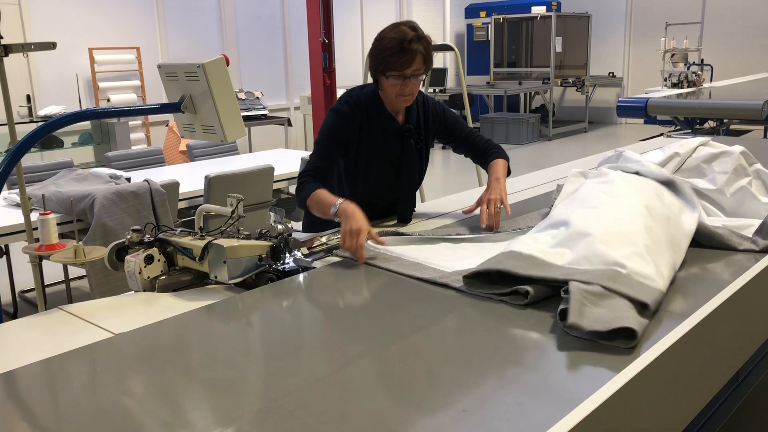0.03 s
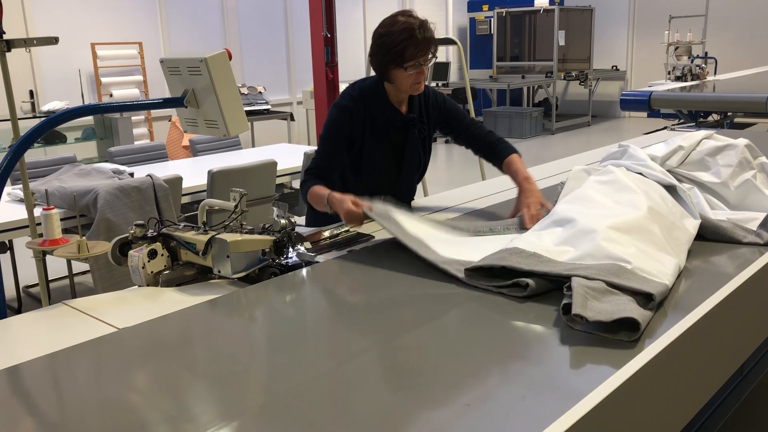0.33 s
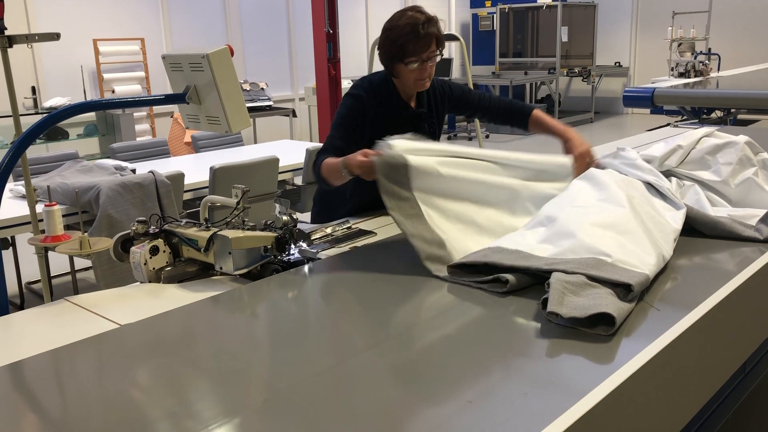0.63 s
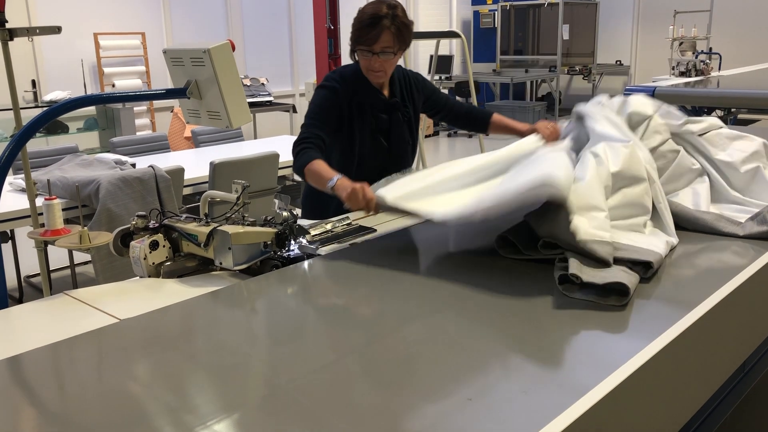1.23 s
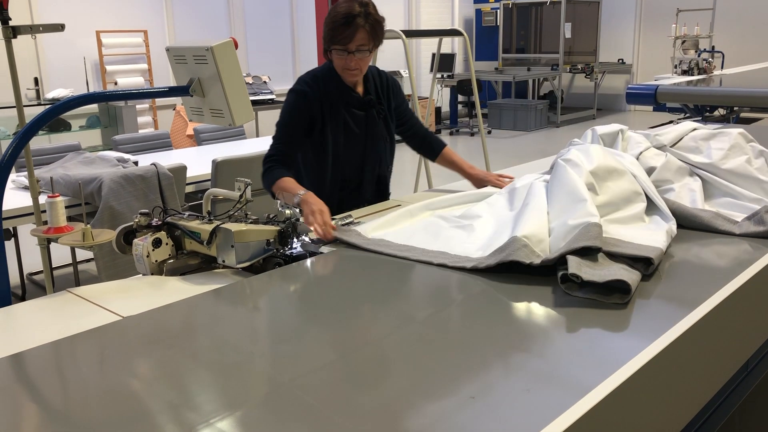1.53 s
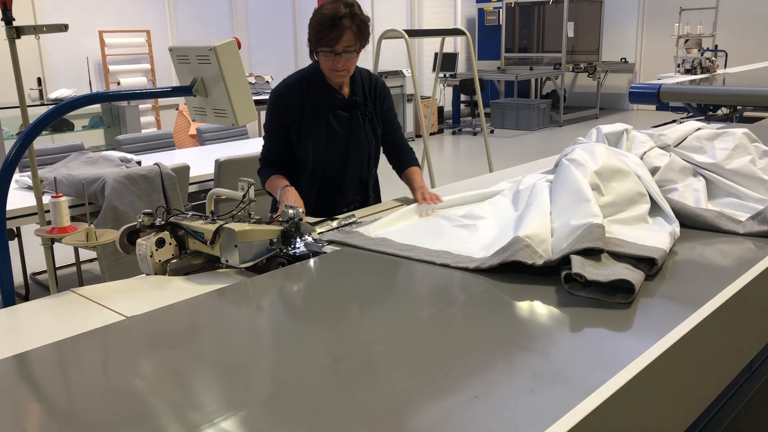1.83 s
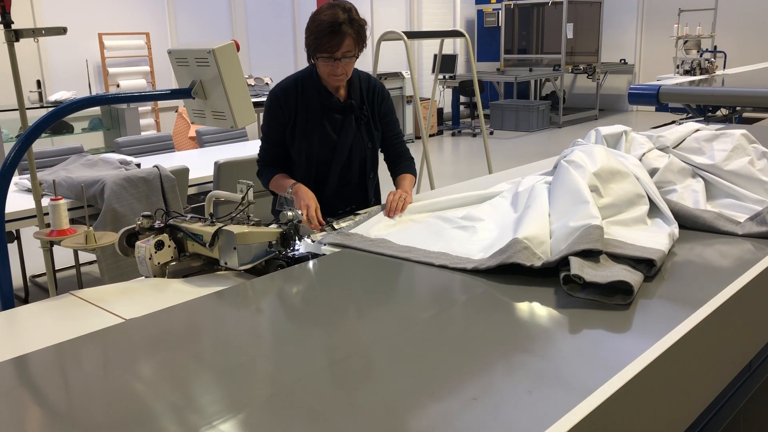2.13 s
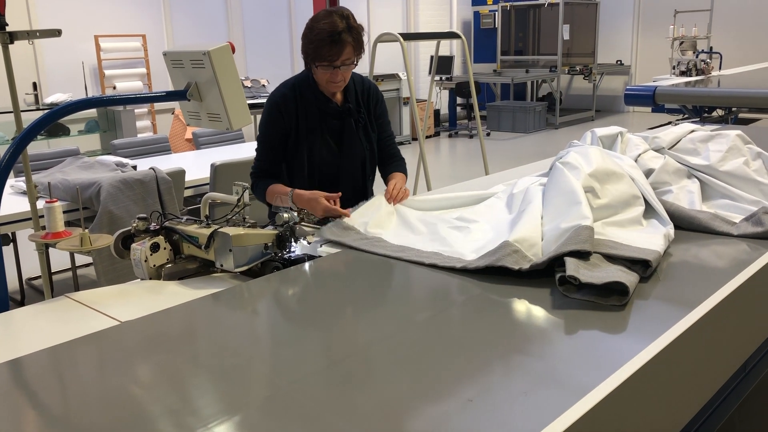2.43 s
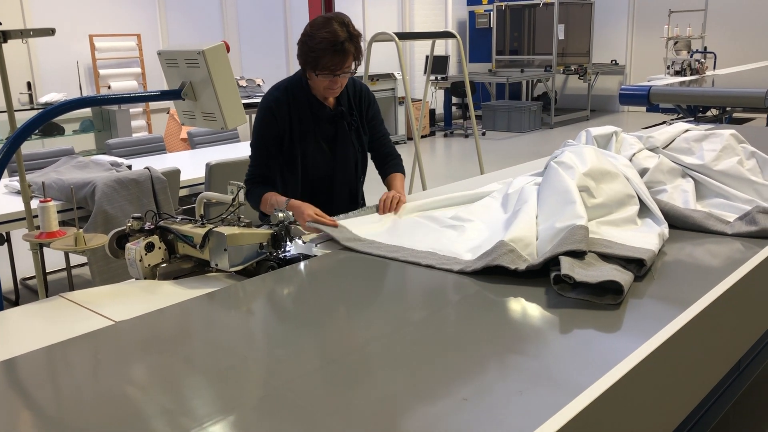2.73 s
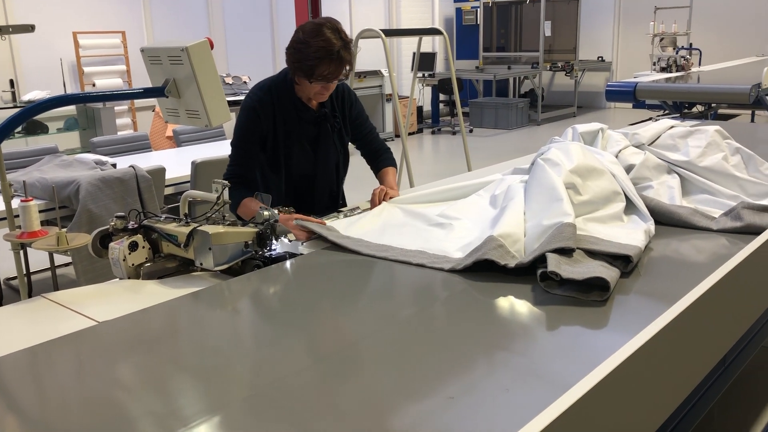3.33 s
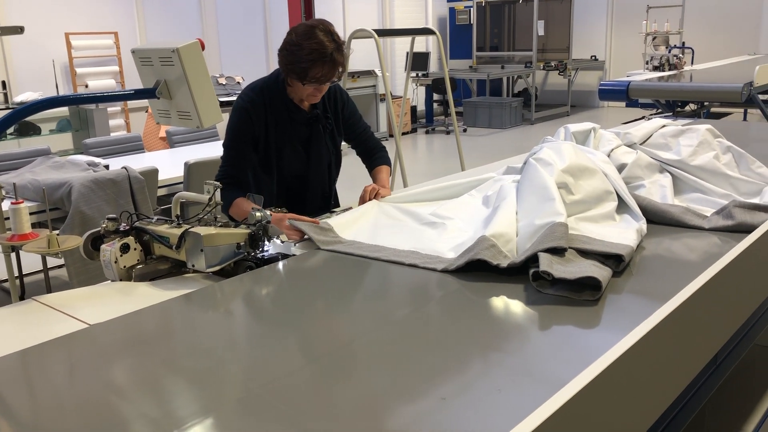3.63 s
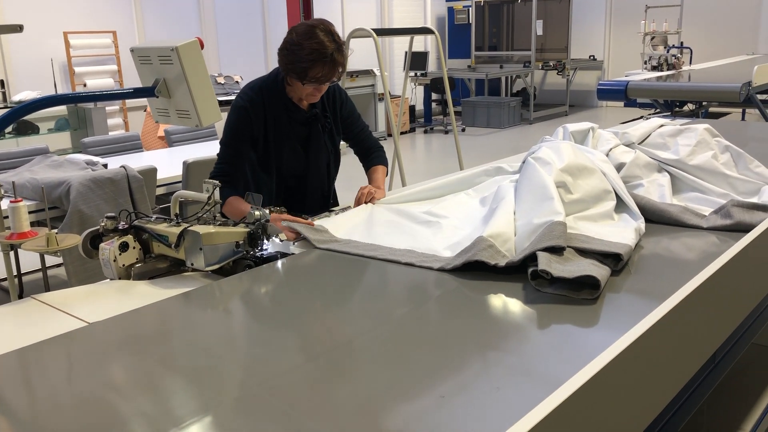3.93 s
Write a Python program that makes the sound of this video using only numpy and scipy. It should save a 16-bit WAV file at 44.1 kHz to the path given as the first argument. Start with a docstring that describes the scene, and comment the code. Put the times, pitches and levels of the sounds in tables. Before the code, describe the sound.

Heavy fabric swishes up, snaps taut and flops onto a table with dull thumps and crease pops. It slides with a hiss and a small metal clink, over steady motor hum and ventilation in a workshop hall.

```python
"""Over a workshop's hum, a crease pops and a heavy coated curtain swishes up, its ribbed weave zipping
under the fingers. Flung over a sewing table, the sheet snaps taut and flops down in dull thumps and
more pops. It slides back with a friction hiss, and a small metal part clinks as the edge is laid by
the machine. A short hall tail follows each move; motors and ventilation run steadily underneath."""
import sys
import numpy as np
from scipy import signal
from scipy.fft import rfft, irfft, next_fast_len
from scipy.io import wavfile
from scipy.ndimage import map_coordinates

SR = 44100
rng = np.random.default_rng(int(sys.argv[2]) if len(sys.argv) > 2 else 0)


def persist_wave(psi):
    """Save psi, clipped to +-1, as 16-bit WAV."""
    counts = np.round(np.clip(psi, -1, 1) * 32767).astype(np.int16)
    wavfile.write(sys.argv[1], SR, np.atleast_2d(counts).T)


N = 176400

# cloth swishing through the air (start [s], attack [s], hold [s], release [s], level [dB])
AIR_SWISHES = [(.43, 0.047, .11, 0.2, -54), (.69, 0.047, 0.037, 0.035, -62),
               (.785, 0.023, 0.2, 0.12, -56.5), (1.1, .05, 0.11, 0.24, -61),
               (1.75, 0.14, 0.13, 0.26, -61.5), (2.7, .14, .06, .15, -65)]
# bright hiss of a swish (frequency [Hz], gain [dB])
SWISH_EQ = [(300, -11), (1000, 1.5), (2800, 4), (5000, 3), (7000, -3), (9500, -1.5), (13500, -4),
            (16000, -12)]
# cloth dragging on the table (start [s], attack [s], hold [s], release [s], level [dB])
TABLE_DRAGS = [(.81, 0.012, 0.054, 0.22, -53), (1.09, 0.034, 0.089, 0.37, -58.5),
               (1.96, 0.14, 0.051, 0.3, -48.5)]
# darker, midrange rub of a drag (frequency [Hz], gain [dB])
DRAG_EQ = [(150, -25), (450, -3.5), (600, -2.5), (750, 5), (900, -1.5), (1200, 2), (1450, -4), (1750, 0.5),
           (2150, -4.5), (2700, -13), (4100, -10.5), (5700, -16.5), (7200, -22), (9300, -19.5),
           (11000, -28), (16000, -33)]
# ribs of the weave passing the fingers (time [s], rate [ribs/s], level [dB])
ZIP_GESTURE = [(.445, 1700, -77), (.458, 2200, -65), (.476, 2630, -47.5), (.493, 2300, -61),
               (.512, 1850, -57.5), (.546, 1700, -56), (.552, 2700, -68), (.561, 3100, -48.5),
               (.571, 3800, -50), (.582, 4500, -69)]
# crack of the sheet snapping taut (frequency [Hz], gain [dB])
SNAP_EQ = [(200, -27), (800, -5), (1600, 1), (3000, -6), (4700, -8), (5800, -24), (7500, -42), (14000, -60)]
# the cloth's weight landing (time [s], level [dB])
THUMP_HITS = [(.8262, -29), (.853, -41), (.954, -33.5)]
# dull ring of a thump (frequency [Hz], gain [dB], t60 [s])
THUMP_BODY = [(255, -8, .05), (330, -1, .06), (483, -4.5, 0.021), (610, -6, .035)]
# creases popping (time [s], peak [dB], centre [Hz], t60 [s])
CREASE_POPS = [(.156, -43.5, 2430, 0.01), (.5765, -39, 900, .012), (.875, -39, 1090, .008),
               (0.887, -44, 1500, 0.0094), (0.899, -39.5, 1700, 0.0073), (.9545, -37.5, 810, 0.0062),
               (1.1155, -43.5, 1500, .006), (1.13, -38.5, 1300, .008), (1.134, -38.5, 2800, 0.0083),
               (1.1624, -36, 1400, .008), (1.1822, -43, 4000, 0.0043), (1.197, -42, 4020, .007),
               (1.256, -45, 2400, 0.019), (1.302, -47, 1000, 0.0091), (1.426, -43.5, 3800, .012)]
# small hard parts ticking (time [s], peak [dB])
TICK_HITS = [(1.147, -41), (1.1595, -31), (1.957, -45)]
# glassy top end of a tick (frequency [Hz], gain [dB])
TICK_EQ = [(2000, -37), (6000, -11), (10000, -14), (11500, -2.5), (13000, 3), (14200, -26), (16000, -12)]
# metal touching the table (time [s], level [dB])
CLINK_HITS = [(1.75, -37), (1.7746, -42), (1.783, -40.5), (1.96, -51)]
# ring of the metal part (frequency [Hz], gain [dB], t60 [s])
METAL_MODES = [(4070, -15.5, 0.12), (4470, -3.5, .045), (4610, -1.5, 0.039), (5560, -12, 0.04),
               (6370, -4.5, 0.026), (6780, -10, .03), (7780, -11.5, 0.047), (8740, -17, 0.073),
               (10000, -17, .035)]
# gritty edge of a clink (frequency [Hz], gain [dB])
SCRAPE_EQ = [(2000, -27), (4200, -3), (7500, -2), (11000, -4), (16000, -12)]
# decay of the hall (frequency [Hz], t60 [s])
HALL_DECAY = [(200, 0.99), (2000, 0.41), (12000, 0.34)]
# swells and dips of the main motor hum (time [s], level [dB])
HUM_FADER = [(0.0, -41), (0.03, -40.5), (0.4, -37), (0.97, -38), (1.24, -43), (1.64, -37), (1.78, -40),
             (2.27, -39), (2.42, -44), (2.48, -39.5), (2.86, -40), (3.02, -38), (3.05, -40.5),
             (3.09, -37.5), (3.38, -38), (4.0, -43.5)]
# thin machine whines (frequency [Hz], level [dB])
MACHINE_WHINES = [(1196, -73), (2386, -73.5), (3585.5, -76), (4558, -84)]
# low rumble of the ventilation (frequency [Hz], gain [dB])
RUMBLE_EQ = [(20, -30), (30, -17), (40, -8.5), (52, -5.5), (68, 0), (100, -2.5), (150, 2), (210, -1.5),
             (300, -4.5), (380, -8.5), (520, -54), (1000, -68)]
# airy hiss of the ventilation (frequency [Hz], gain [dB])
AIR_EQ = [(240, -33), (400, 0), (450, -3), (500, 0.5), (600, -2), (750, -1), (1200, -5.5), (1400, -6.5),
          (2200, -10.5), (2700, -8), (3200, -11.5), (4500, -14.5), (5600, -16.5), (6600, -20),
          (8500, -21.5), (10000, -21.5), (13600, -21), (14300, -25), (15800, -30)]

CRINKLES_PER_S, CRINKLE_SPREAD_DB, CRINKLE_DB, FLUTTER_DB = 260, 3.5, -11, 1.25
ZIP_JITTER, ZIP_ROUGHNESS_DB, ZIP_OCTAVE_DB = 0.071, 2, -13
SNAP_S, SNAP_DB, POP_STEP_OCTAVES = 0.8243, -21, 0.52
SCRAPE_DB, HALL_DB = -7, -16.5
HUM_HZ, HUM_WAVER_DB, HUM_OCTAVE_DB = 165.2, 0.3, -27
DRONE_HZ, DRONE_WIDTH_HZ, DRONE_DB = 348, 55, -62
RUMBLE_DB, AIR_DB = -50, -54.5
LOW_CUT_HZ, HIGH_CUT_HZ = 36, 15850


def sheet_flop():
    """The sheet snaps taut in one sharp pulse, then its weight lands in damped thumps."""
    out = np.zeros(N)
    add(out, SNAP_S, amp(SNAP_DB) * impulse(SNAP_EQ))
    for s, db in THUMP_HITS:
        add(out, s, -amp(db) * ring(THUMP_BODY, attack_s=0.00089, scatter_db=5.5, blur_hz=6.7))
    return out


def cloth_rustle(strokes, eq):
    """Friction hiss with tiny crinkles in it, swelling and fading with each move."""
    envelope = np.zeros(N)
    for s, attack, hold, release, db in strokes:
        corners = s + np.cumsum([0, attack, hold, release])
        envelope += amp(db) * np.interp(clock(), corners, [0, 1, 1, 0])
    clicks = (rng.random(N) < CRINKLES_PER_S / SR) * rng.choice([-1, 1], N)
    crinkles = clicks * amp(CRINKLE_SPREAD_DB * rng.standard_normal(N))
    flutter = amp(FLUTTER_DB * wobble(45))
    return envelope * flutter * (noise(eq) + amp(CRINKLE_DB) * coloured(crinkles, eq))


def weave_zip():
    """Ribbed cloth runs through the fingers: a rough whistle whose pitch follows its speed."""
    rib_hz, level_db = curves(ZIP_GESTURE)
    phase = 2 * np.pi * np.cumsum(rib_hz * (1 + ZIP_JITTER * wobble(1500))) / SR
    whistle = unit(np.sin(phase) + amp(ZIP_OCTAVE_DB) * np.sin(2 * phase))
    sliding = (clock() > ZIP_GESTURE[0][0]) & (clock() < ZIP_GESTURE[-1][0])
    return sliding * amp(level_db + ZIP_ROUGHNESS_DB * wobble(250)) * whistle


def crease_pops():
    """Each crease lets go in a very short puff of noise around its own pitch."""
    out = np.zeros(N)
    for s, db, hz, t60 in CREASE_POPS:
        bell_eq = [(hz * 2 ** (k * POP_STEP_OCTAVES), -3.5 * k * k) for k in range(-4, 5)]
        add(out, s, amp(db) * burst(bell_eq, t60))
    return out


def fittings():
    """Hard little parts tick, scrape and clink on the table."""
    out = np.zeros(N)
    for s, db in TICK_HITS:
        add(out, s, amp(db) * burst(TICK_EQ, t60=0.012))
    for s, db in CLINK_HITS:
        clink = ring(METAL_MODES, attack_s=0.0021, scatter_db=0, blur_hz=70)
        scrape = amp(SCRAPE_DB) * burst(SCRAPE_EQ, t60=0.071)
        add(out, s, amp(db) * (clink + scrape))
    return out


def hall(x):
    """The hall's reverb: a diffuse tail that dies faster in the treble."""
    hz, t, spectrum = signal.stft(rng.standard_normal(SR), SR, nperseg=256)
    decay = amp(-60 * t / along(HALL_DECAY, hz)[:, None])
    tail = signal.istft(spectrum * decay, SR)[1]
    return signal.fftconvolve(x, tail / np.linalg.norm(tail))[:N]


def motors():
    """A main hum that swells and dips, with a deeper hum below and thin whines above."""
    level_db, = curves(HUM_FADER)
    phase = 2 * np.pi * HUM_HZ * clock()
    hum = unit(np.sin(phase) + amp(HUM_OCTAVE_DB) * np.sin(2 * phase))
    hum *= amp(level_db + HUM_WAVER_DB * wobble(21.6))
    low_hum = machine_tone(hz=85.7, db=-52.5, waver_db=2)
    whines = sum(machine_tone(hz, db, waver_db=2.5) for hz, db in MACHINE_WHINES)
    return hum + low_hum + whines


def machine_tone(hz, db, waver_db):
    """A running machine's sine tone, slightly unsteady in level and pitch."""
    level = amp(db + waver_db * wobble(6.98))
    return level * unit(np.sin(2 * np.pi * hz * clock() + 0.49 * wobble(6)))


def machine_drone():
    """Another machine drones: noise through one narrow resonance."""
    resonance = lambda hz: 1 / (1 + (2 * (hz - DRONE_HZ) / DRONE_WIDTH_HZ) ** 2)
    return amp(DRONE_DB) * unit(filtered(rng.standard_normal(N), resonance))


def ventilation():
    """Moving air lays a steady bed of rumble and hiss."""
    return amp(RUMBLE_DB) * noise(RUMBLE_EQ) + amp(AIR_DB) * noise(AIR_EQ)


def amp(db):
    return 10 ** (np.asarray(db) / 20)


def unit(x):
    """x at rms 1."""
    return x / np.sqrt(np.mean(x ** 2) + 1e-20)


def along(points, hz):
    """Read (frequency, value) points at hz, on a log axis."""
    freqs, values = np.transpose(points)
    return np.interp(np.log(hz + 1), np.log(freqs + 1), values)


def clock():
    return np.arange(N) / SR


def curves(rows):
    """One automation curve for each column after the time."""
    times, *columns = np.transpose(rows)
    return [np.interp(clock(), times, column) for column in columns]


def wobble(rate):
    """A smooth random curve, rate knots a second."""
    return map_coordinates(rng.standard_normal(int(N * rate / SR) + 4), [clock() * rate])


def filtered(x, response):
    """x through a filter whose gain is response(hz)."""
    size = next_fast_len(N + SR // 2)
    return irfft(rfft(x, size) * response(np.fft.rfftfreq(size, 1 / SR)), size)[:N]


def coloured(x, eq):
    """x through an EQ curve, at rms 1."""
    return unit(filtered(x, lambda hz: amp(along(eq, hz))))


def noise(eq):
    return coloured(rng.standard_normal(N), eq)


def impulse(eq, size=2048):
    """The tightest click with this spectrum, peak 1."""
    cepstrum = irfft(np.log(amp(along(eq, np.fft.rfftfreq(size, 1 / SR)))))
    cepstrum[1:size // 2] *= 2  # minimum phase packs the energy at the front
    cepstrum[size // 2 + 1:] = 0
    pulse = irfft(np.exp(rfft(cepstrum)))
    return pulse / np.abs(pulse).max()


def burst(eq, t60):
    """A dying puff of coloured noise, peak 1."""
    t = np.arange(SR // 4) / SR
    white_puff = rng.standard_normal(len(t)) * amp(-60 * t / t60)
    puff = signal.fftconvolve(white_puff, impulse(eq))[:len(t)]
    return puff / np.abs(puff).max()


def ring(modes, attack_s, scatter_db, blur_hz):
    """Damped modes, their balance scattered per hit and their pitch blurred by the rubbing contact."""
    t = np.arange(SR // 4) / SR
    tones = np.zeros(len(t))
    for hz, db, t60 in modes:
        envelope = amp(db + scatter_db * rng.standard_normal() - 60 * t / t60)
        drift = np.cumsum(rng.standard_normal(len(t))) * np.sqrt(2 * np.pi * blur_hz / SR)
        tones += envelope * np.sin(2 * np.pi * hz * t + drift)
    return tones * (1 - np.exp(-t / attack_s))


def add(track, s, sound):
    """Mix a sound into the track at time s."""
    part = track[max(round(s * SR), 0):][:len(sound)]
    part += sound[:len(part)]


def scene():
    """Mono mix: the curtain and its reverb over the workshop bed."""
    curtain = cloth_rustle(AIR_SWISHES, SWISH_EQ) + cloth_rustle(TABLE_DRAGS, DRAG_EQ)
    curtain += weave_zip() + sheet_flop() + crease_pops() + fittings()
    reverb = amp(HALL_DB) * hall(curtain)
    workshop = motors() + machine_drone() + ventilation()
    return (curtain + reverb + workshop)[None]


def record(dry):
    """Master EQ: roll off the deep bass and cut the very top with a brick wall."""
    low_cut = signal.butter(4, LOW_CUT_HZ, "highpass", fs=SR, output="sos")
    return filtered(signal.sosfilt(low_cut, dry[0]), lambda hz: hz < HIGH_CUT_HZ)[None]


dry = scene()
out = record(dry)
persist_wave(out)
```